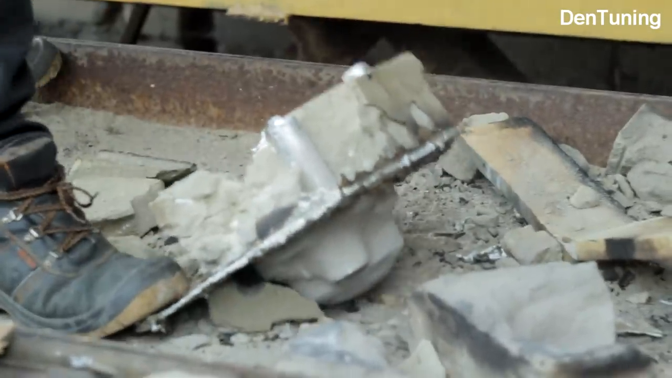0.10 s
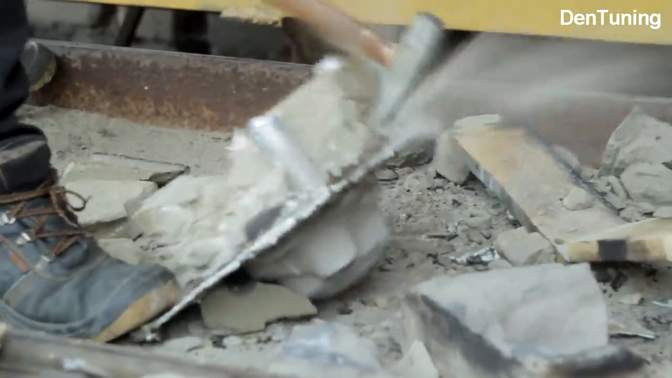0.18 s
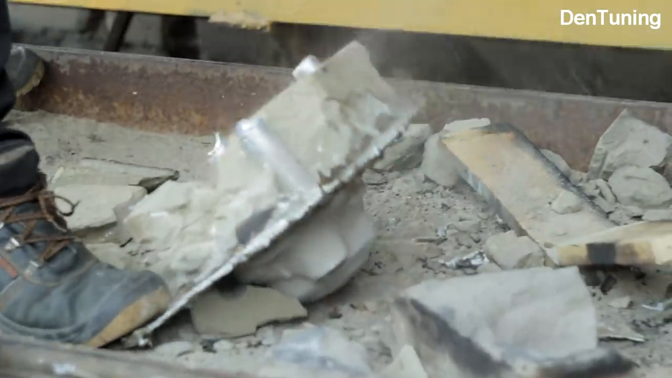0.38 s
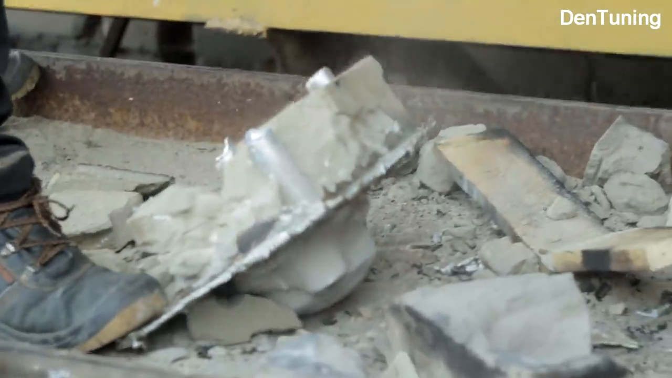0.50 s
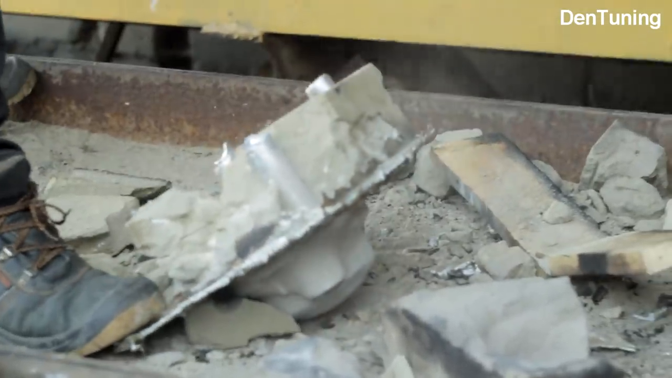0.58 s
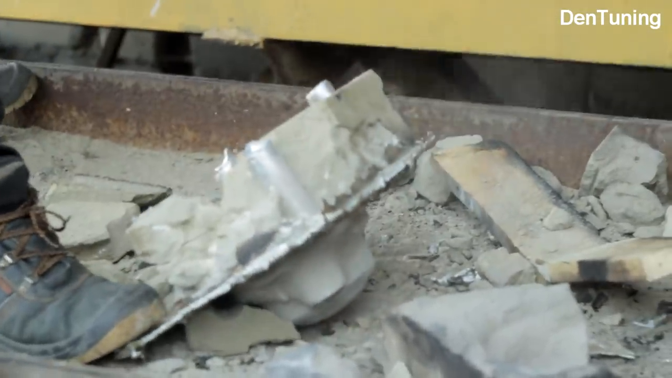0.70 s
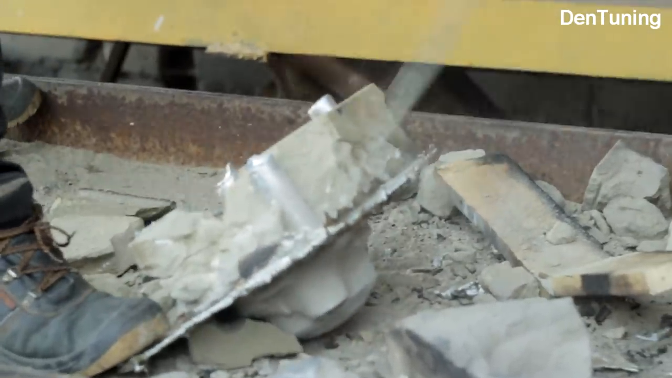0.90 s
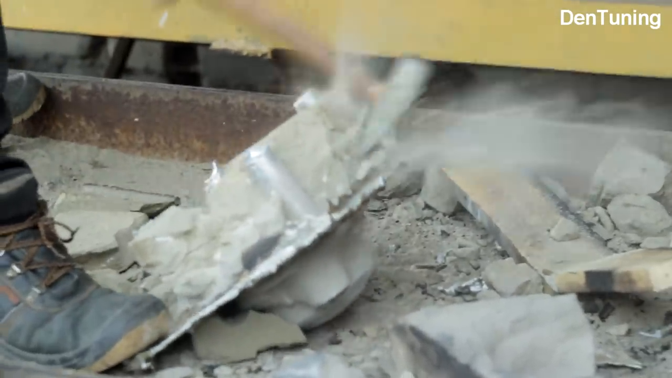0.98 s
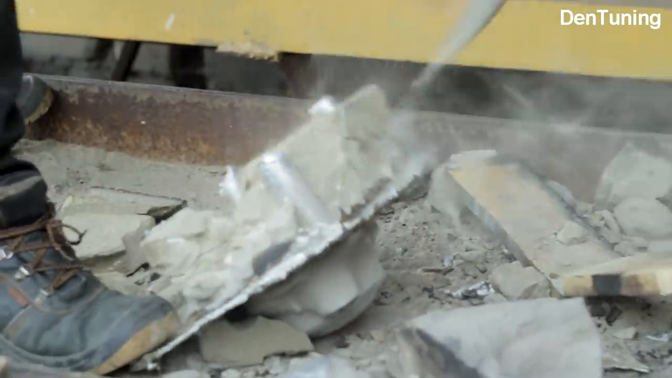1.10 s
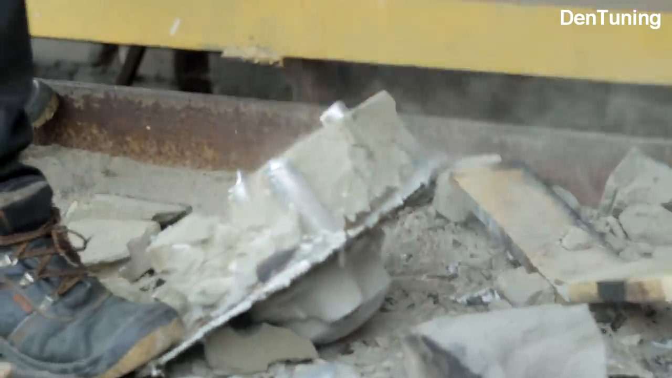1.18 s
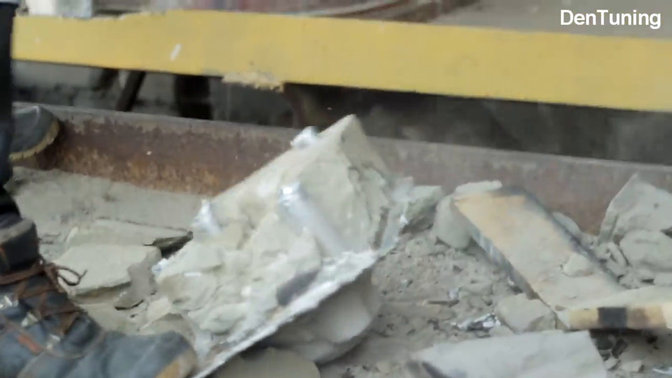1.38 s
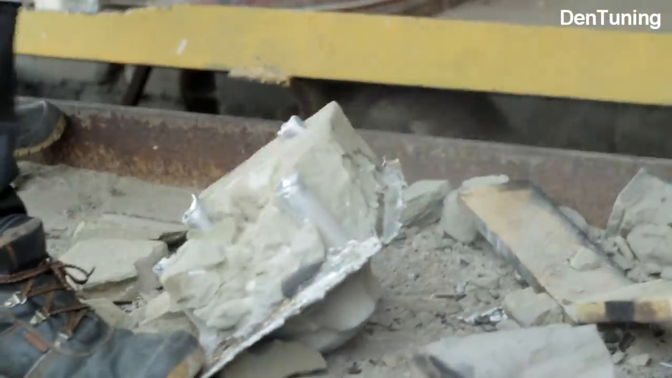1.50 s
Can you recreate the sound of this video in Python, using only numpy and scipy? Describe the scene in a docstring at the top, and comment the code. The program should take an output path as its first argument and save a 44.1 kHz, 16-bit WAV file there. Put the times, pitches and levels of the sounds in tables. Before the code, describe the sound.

Two hard hammer blows on a sand-caked metal casting, crumbs pattering, then a gritty drag

```python
"""Hammer on a sand mould

A work yard, one microphone channel: two blows on a hardened sand mould on a tilted metal casting.
Shaped noise and decaying sines crack, thud and ring; nearby steel and the yard throw them back.
Random grains make sand and crumbs, noise bursts make chips and soft bumps, wavering sines make clinks.
Near the end the casting is rocked and dragged over gritty ground, above a steady quiet hiss."""
import sys
import numpy as np
from scipy import signal
from scipy.fft import rfft, irfft
from scipy.io import wavfile

SR = 44100
rng = np.random.default_rng(int(sys.argv[2]) if len(sys.argv) > 2 else 0)


def generate_wav(sig):
    """Save sig (samples, or channels by samples) to the path in sys.argv[1] as 16-bit PCM at SR."""
    pcm = np.round(np.clip(np.atleast_2d(sig).T, -1, 1) * 32767).astype(np.int16)
    wavfile.write(sys.argv[1], SR, pcm)


N = 68355  # length of the scene [samples]

# Modes of the casting, damped by the sand:
# (frequency [Hz], level in first blow [dB], level in second blow [dB], t60 [s])
CASTING_MODES = [(126.2, -43.5, -52.5, 0.85), (156.1, -30, -33.5, 0.32), (178.6, -17.5, -64, 0.065),
                 (197, -27.5, -36.5, 0.42), (247.3, -34.5, -52.5, 0.365), (338, -40, -70, 0.38),
                 (360, -44, -40, 0.34), (444.8, -34, -49, 0.24), (517.7, -34, -24.5, 0.137),
                 (594.4, -31.5, -58, 0.32), (643, -35, -32, 0.26), (759, -36, -40.5, 0.3),
                 (821, -34.5, -46, 0.21), (1093, -39, -62, 0.2), (1277, -67, -46.5, 0.45),
                 (1792, -39, -38.5, 0.17)]
# First reflections off nearby steel, paths about 2.6 m and 4.9 m longer: (delay [s], level [dB])
STEEL_ECHOES = [(.0075, -9.5), (0.0142, -6.5)]
BASS_HZ = 300  # below this the thud and the casting build up more slowly
CONTACT_S = 0.00036  # onset time constant: loose sand is crushed before the head bites


def amp(db):
    """Decibels to gain."""
    return 10 ** (np.asarray(db) / 20)


def unit(x):
    """Scales to rms 1."""
    return x / np.sqrt(np.mean(x ** 2) + 1e-20)


def clock():
    """Time of every sample [s]."""
    return np.arange(N) / SR


def fade(t60):
    """Exponential decay from time zero, down 60 dB after t60 seconds."""
    return np.exp(-np.log(1000) * clock() / np.maximum(t60, 1e-3))


def rise(s):
    """Soft onset from time zero with a time constant of s seconds."""
    return 1 - np.exp(-clock() / max(s, 1e-5))


def add(mix, s, sound):
    """Mixes a sound in at time s."""
    part = mix[max(round(s * SR), 0):]
    part += sound[:len(part)]


def colour(x, points):
    """Gives a white signal of rms 1 a spectrum in dB per octave, falling steeply below the first point."""
    hz = np.maximum(np.fft.rfftfreq(2 * N, 1 / SR), 1)
    f, db = np.transpose(points)
    gain = amp(np.interp(np.log(hz), np.log(f), db))
    gain = gain * np.minimum(hz / f[0], 1) ** 2
    per_octave = np.sqrt(SR / 2 / hz / np.log(2))  # white noise holds more power in higher octaves
    return irfft(rfft(x, 2 * N) * gain * per_octave)[:N]


def grains(per_s, spread_db):
    """Random clicks of differing size and either sign, rms 1 overall."""
    size = amp(spread_db * np.minimum(rng.exponential(1, N), 4))
    sign = rng.choice([-1, 1], N)
    struck = rng.random(N) < per_s / SR
    return unit(size * sign * struck)


def lumps(depth_db, length_s):
    """Random gain of rms 1, drifting between knots length_s apart."""
    knots = rng.standard_normal(N)
    return unit(amp(depth_db * np.interp(clock() / max(length_s, 1e-3), np.arange(N), knots)))


def even_noise(size):
    """White noise of rms 1 with its energy spread evenly over frames of the given size [samples]."""
    x = rng.standard_normal(N)
    for _ in range(2):
        z = signal.stft(x, nperseg=size)[2]
        x = signal.istft(z / (abs(z) + 1e-12), nperseg=size)[1][:N]
    return unit(x)


def band_noise(centre_hz, octaves):
    """Noise of rms 1 in one broad resonance."""
    hz = np.fft.rfftfreq(N, 1 / SR) + 1
    shape = 1 / (1 + .5 * (np.log2(hz / centre_hz) / octaves) ** 2) ** 2
    return unit(irfft(rfft(even_noise(size=512)) * shape, N))


def ring(modes):
    """Struck modes: decaying sines of alternating sign from rows of (Hz, dB, t60)."""
    out = np.zeros(N)
    for k, (hz, db, t60) in enumerate(modes):
        out += (-1) ** k * amp(db) * fade(t60) * np.sin(2 * np.pi * hz * clock())
    return out


def echoes(x):
    """A sound with its first reflections off nearby steel."""
    out = x.copy()
    for delay, db in STEEL_ECHOES:
        add(out, delay, amp(db) * x)
    return out


def crumbs(low_hz, high_hz, count=7):
    """Crumbs of several sizes tumble together, each ticking briefly at its own pitch; rms 1."""
    crumb_t60, crumbs_per_s, spread_db = 0.023, 900, 2  # [s], [1/s] over all sizes, [dB]
    out = np.zeros(N)
    for hz in np.geomspace(low_hz, high_hz, count):
        tick = fade(crumb_t60) * np.cos(2 * np.pi * hz * clock())
        hits = grains(crumbs_per_s / count, spread_db)
        out += signal.fftconvolve(hits, tick[:SR // 20])[:N]
    return unit(out)


def knocks(rows, rise_s, rough_db):
    """Small impacts: noise bursts broken up by grit, each with a faint tail from the yard."""
    rough_s, tail_db, tail_t60 = .0012, -18.5, 0.61  # [s], [dB], [s]
    out = np.zeros(N)
    for s, db, centre_hz, octaves, t60 in rows:
        direct = fade(t60) * lumps(rough_db, rough_s)
        level = np.hypot(direct, amp(tail_db) * fade(tail_t60))
        add(out, s, amp(db) * band_noise(centre_hz, octaves) * rise(rise_s) * level)
    return out


def yard():
    """Background of the yard: steady shaped noise, a quiet hiss."""
    # Background spectrum: (frequency [Hz], level [dB per octave])
    hiss = [(25, -88), (150, -78.5), (400, -80), (2200, -74.5), (5000, -80), (16000, -84)]
    return colour(rng.standard_normal(N), hiss)


def bumps():
    """Soft bumps of the casting settling: narrow low noise with a slow onset."""
    # Bumps: (time [s], level [dB], centre [Hz], width [octaves], t60 [s])
    rows = [(.548, -53.5, 130, 0.11, 0.45), (.918, -62, 79, 0.49, 0.21), (1.49, -53, 190.5, 0.13, 0.44)]
    return knocks(rows, rise_s=0.015, rough_db=0.5)


def chips():
    """Chips of mould land: short rough noise bursts, each around its own pitch."""
    # Landings: (time [s], level [dB], centre [Hz], width [octaves], t60 [s])
    rows = [(.4025, -65, 9000, 1.2, 0.12), (.5138, -66.5, 3070, 0.77, 0.13),
            (.5345, -64.5, 9900, 0.83, 0.027), (.6025, -53, 4630, 1.06, 0.1), (.669, -58, 6050, 2, 0.078),
            (.691, -57, 4270, 0.54, 0.13), (.8251, -64.5, 3040, 2.5, 0.014),
            (.8665, -63, 10400, 0.67, 0.032), (1.1826, -60, 4000, 0.88, 0.035),
            (1.2354, -65, 4414, 0.97, 0.13), (1.2963, -64.5, 4500, 1.1, 0.74),
            (1.4255, -67, 10300, 0.61, .025)]
    return knocks(rows, rise_s=.0003, rough_db=3)


def clinks():
    """Chips strike scraps of metal: loose scraps rattle, so their decaying sines wander in phase."""
    # One row per ring: (time [s], frequency [Hz], level [dB], t60 [s])
    rings = [(.6025, 6090, -55.5, 0.15), (.669, 7080, -57, 0.074), (.691, 1324, -61, 0.3),
             (.691, 2134, -55.5, 0.23), (.691, 3860, -58, 0.34), (0.69, 4955, -60.5, 0.1)]
    width = .09  # blur of each ring as a share of its pitch
    out = np.zeros(N)
    for s, hz, db, t60 in rings:
        wander = np.cumsum(rng.standard_normal(N)) * np.sqrt(2 * np.pi * width * hz / SR)
        add(out, s, amp(db) * fade(t60) * np.sin(2 * np.pi * hz * clock() + wander))
    return out


def spills():
    """Clods break into a spill: tumbling crumbs that swell quickly and die away."""
    # Spills: (time [s], level [dB], lowest crumb [Hz], highest crumb [Hz], t60 [s])
    clods = [(.368, -41.5, 540, 1540, 0.14), (.552, -58, 1200, 2160, 0.36),
             (1.175, -56.5, 1700, 2000, 0.25), (1.232, -49, 796, 2420, 0.15), (1.308, -48, 580, 885, 0.083),
             (1.474, -43, 875, 1350, 0.24)]
    out = np.zeros(N)
    for s, db, low_hz, high_hz, t60 in clods:
        add(out, s, amp(db) * crumbs(low_hz, high_hz) * rise(0.012) * fade(t60))
    return out


def snaps():
    """Mould pieces snap dryly under load: a few very short modes and a fainter noise tail."""
    # Snaps: (time [s], level [dB])
    breaks = [(0.1129, -48), (0.1215, -45.5), (0.1278, -43), (0.1757, -47), (0.94, -56)]
    # Modes of a piece: (frequency [Hz], level within a snap [dB], t60 [s])
    modes = [(1136, -1.5, 0.016), (2080, 1.5, 0.0039), (5600, -12.5, 0.0066)]
    tail_db, tail_t60, tail_octaves = -10, 0.15, 1
    out = np.zeros(N)
    for s, db in breaks:
        tail = amp(tail_db) * band_noise(modes[0][0], tail_octaves)
        tail = tail * rise(STEEL_ECHOES[0][0]) * fade(tail_t60)
        add(out, s, amp(db) * (ring(modes) * rise(CONTACT_S) + tail))
    return out


def drag():
    """Grit and crumbs crunch in clumps under the edge of the casting and stir its modes."""
    # Strength of the drag, silent before the first row: (time [s], level [dB])
    course = [(1.12, -51), (1.21, -13.5), (1.285, -18), (1.352, -5), (1.421, -6), (1.455, -1.5),
              (1.492, -0.5), (1.55, -5.5)]
    # Spectrum of the grit at 0 dB of drag: (frequency [Hz], level [dB per octave])
    grit = [(95, -87), (140, -64), (195, -59), (300, -67.5), (650, -53), (1150, -57.5), (2000, -56),
            (4000, -58.5), (8000, -66.5), (16000, -79)]
    # Crumbs crushed under the casting: (level at 0 dB of drag [dB], lowest [Hz], highest [Hz])
    crushed = (-54.5, 650, 1744)
    grit_per_s, grit_spread_db, lump_db, lump_s = 3500, 1.5, 1.8, 0.005
    ring_db, low_cut_hz = -58, 182  # the low cut keeps the metal ring of the drag thin

    s, db = np.transpose(course)
    force = amp(np.interp(clock(), s, db)) * (clock() > s[0])
    slips = grains(grit_per_s, grit_spread_db) * lumps(lump_db, lump_s)

    equal_modes = [(hz, 0, t60) for hz, _, _, t60 in CASTING_MODES]
    metal = signal.fftconvolve(slips, ring(equal_modes))[:N]
    low_cut = signal.butter(4, low_cut_hz, "high", fs=SR, output="sos")
    metal = unit(signal.sosfilt(low_cut, metal))

    crumb_db, low_hz, high_hz = crushed
    crunch = colour(unit(echoes(slips)), grit) + amp(crumb_db) * crumbs(low_hz, high_hz)
    return force * (crunch + amp(ring_db) * metal)


def falling_sand():
    """Loosened sand patters down: coloured random grains that swell and then thin away."""
    # Spectrum before the level of each blow's sand: (frequency [Hz], level [dB per octave])
    spectrum = [(400, -18), (1500, -1), (3500, -10), (7000, -21), (15000, -16)]
    patter = colour(grains(per_s=980, spread_db=4.5), spectrum)
    return patter * rise(0.11) * fade(1.13)


def hammer_ring(k, free_s):
    """The steel head rings up as it comes free of the sand; reflections make its thin rings waver."""
    # Modes of the head: (frequency [Hz], level in first blow [dB], in second blow [dB], t60 [s])
    modes = [(10670, -56.5, -50, 0.35), (12930, -44, -50, 0.032)]
    return ring(np.array(modes)[:, [0, k + 1, 3]]) * rise(free_s) ** 2 * lumps(4.5, 0.011)


def casting_ring(k, swell_s):
    """The struck casting rings in its damped modes, each range with its own onset."""
    modes = np.array(CASTING_MODES)[:, [0, k + 1, 3]]
    low = modes[:, 0] < BASS_HZ
    return ring(modes[low]) * rise(swell_s) + ring(modes[~low]) * rise(0.01)


def body(k, swell_s):
    """Dense rattle of mould and yard: each band dies at its own speed, the bass builds up slowest."""
    # Crushed sand and its reverberation, before the blow's body level:
    # (frequency [Hz], first blow [dB per octave], second blow [dB per octave], t60 [s])
    bands = np.array([(49.3, -63, -73, 0.31), (100.6, -48, -42, 0.5), (146, -29, -32.5, 0.41),
                      (232, -31, -38, 0.28), (310, -40.5, -42.5, 0.55), (678, -32.5, -34, 0.41),
                      (1100, -39, -39, 0.38), (2250, -45.5, -36, 0.36), (3480, -39.5, -41, 0.3),
                      (6850, -51.5, -45.5, 0.26), (9500, -54, -50.5, 0.15), (16200, -68, -66, 0.46)])
    rise_s, late_db, late_t60 = 0.002, -16.5, 0.98
    rattle = rng.standard_normal(N) * lumps(1.8, .002)  # sand gives way in clumps
    spectrum = rfft(colour(rattle, bands[:, [0, k + 1]]))
    log_hz = np.log(np.fft.rfftfreq(N, 1 / SR) + 1)
    late = amp(late_db) * fade(late_t60)
    out = np.zeros(N)
    for pick, (hz, _, _, t60) in zip(np.eye(len(bands)), bands):
        # overlapping bands: each weight is 1 at its own centre and 0 at its neighbours'
        weight = np.interp(log_hz, np.log(bands[:, 0]), pick)
        band = irfft(spectrum * weight, N)
        onset = rise(swell_s if hz < BASS_HZ else rise_s)
        out += band * onset * np.hypot(fade(t60), late)
    return out


def crack(k, length_s):
    """The head meets the sand: a short burst, the knock of the block, and their first echoes."""
    # Colour of the burst before the blow's crack level:
    # (frequency [Hz], first blow [dB per octave], second blow [dB per octave])
    burst_colour = [(100, -66, -81), (300, -66, -56), (750, -26, -25.5), (1240, -33.5, -21),
                    (2250, -39, -29), (3430, -29.5, -52), (6560, -38.5, -37), (15100, -54.5, -52)]
    # Heavily damped knock of the sand block, before the blow's crack level:
    # (frequency [Hz], first blow [dB], second blow [dB], t60 [s])
    block = [(463, -53, -23.5, 0.044), (528, -49, -29, 0.038), (695, -27, -19.5, 0.036),
             (857, -30.5, -50, 0.065), (1293, -69, -21.5, 0.032), (2056, -33.5, -28.5, 0.017),
             (3000, -38, -27.5, 0.019), (3540, -21.5, -22.5, 0.011), (5800, -26.5, -25.5, 0.0065)]
    burst = colour(even_noise(size=256), np.array(burst_colour)[:, [0, k + 1]])
    burst = burst * np.exp(-(clock() / length_s) ** 2)
    knock = ring(np.array(block)[:, [0, k + 1, 3]])
    return echoes((burst + knock) * rise(CONTACT_S) ** 2)


def blows():
    """Each blow: crack, rattle, ring of casting and hammer, then a patter of loosened sand."""
    # Hammer blows: (time [s], crack [dB], crack length [s], body [dB], bass swell time constant [s],
    # falling sand [dB], time constant of the head coming free and ringing [s])
    strikes = [(0.2382, 0.5, 0.0022, 0.64, 0.014, -57.5, 0.00074),
               (0.9872, 0.33, 0.0025, 0, 0.015, -66, 0.15)]
    out = np.zeros(N)
    for k, (s, crack_db, crack_s, body_db, swell_s, sand_db, free_s) in enumerate(strikes):
        blow = amp(crack_db) * crack(k, crack_s)
        blow += amp(body_db) * body(k, swell_s)
        blow += casting_ring(k, swell_s) + hammer_ring(k, free_s)
        blow += amp(sand_db) * falling_sand()
        add(out, s, blow)
    return out


def scene():
    """All sources over the quiet hiss of the yard, on one channel."""
    debris = bumps() + chips() + clinks() + spills() + snaps()
    return (yard() + debris + drag() + blows())[None]


def record(dry):
    """The recorder's band limit: a steep low-pass at 16.2 kHz."""
    low_pass = signal.firwin(255, 16200, window=("kaiser", 9), fs=SR)
    return signal.oaconvolve(dry, low_pass[None], "same")


dry = scene()
out = record(dry)
generate_wav(out)
```